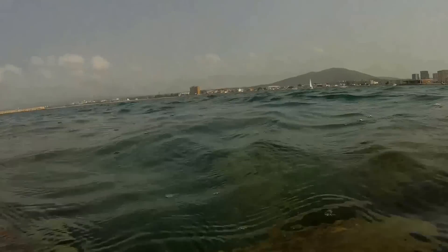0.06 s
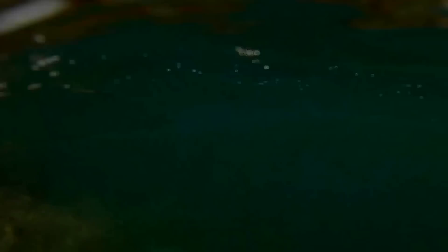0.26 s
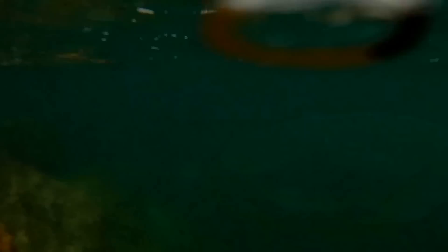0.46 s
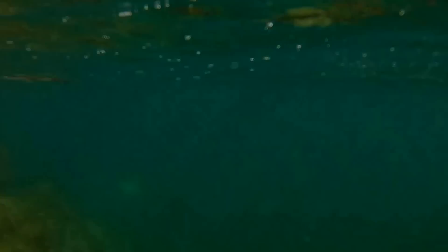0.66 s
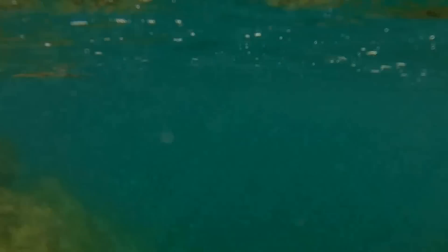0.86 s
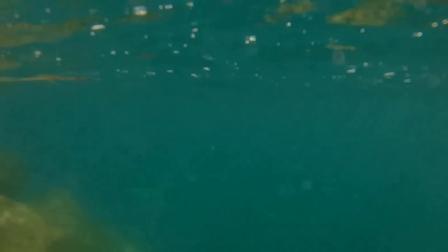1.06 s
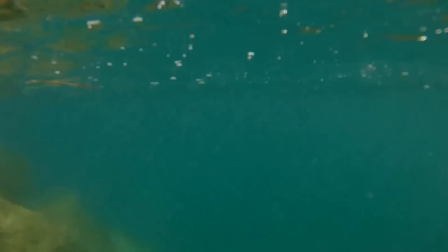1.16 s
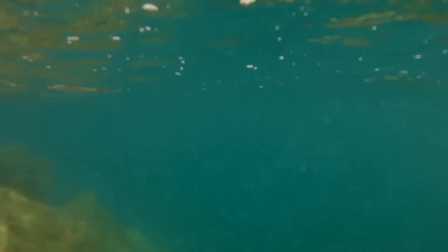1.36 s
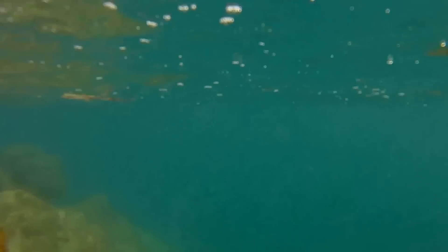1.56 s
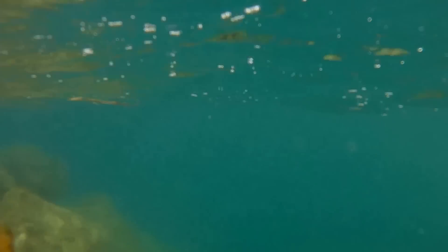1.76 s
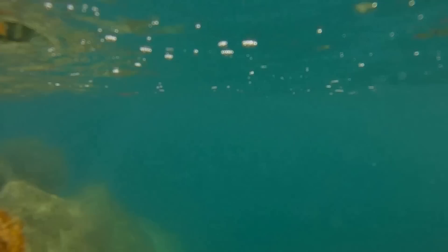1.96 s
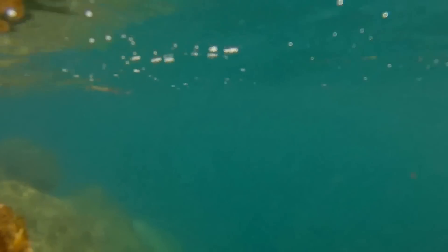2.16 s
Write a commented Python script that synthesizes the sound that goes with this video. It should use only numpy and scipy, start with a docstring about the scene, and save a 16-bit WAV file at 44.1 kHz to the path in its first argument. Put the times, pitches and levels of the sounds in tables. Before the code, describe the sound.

A wave slaps against a waterproof camera at the sea surface after a moment of faint lapping. Drops and bubbles crackle on the plastic housing as it sinks, leaving a quiet muffled wash and a few lone ticks.

```python
"""Faint lapping sea, then a wave slaps right against the microphone's sealed plastic camera housing.
As it dips under the surface, trapped air crackles off as drops and bubbles that tick on the shell;
under water a muffled wash and a few lone ticks remain. The one microphone inside the shell feeds
two inputs; each adds its own hiss, and the left one drifts with a deep rumble."""
import sys
import numpy as np
from scipy import signal
from scipy.fft import rfft, irfft
from scipy.io import wavfile
from scipy.ndimage import uniform_filter1d

SR = 44100
rng = np.random.default_rng(int(sys.argv[2]) if len(sys.argv) > 2 else 0)


def unload_audio(sound):
    """Save the sound as a 16-bit wav file, at the path given as the first command line argument."""
    columns = np.transpose(np.atleast_2d(sound))
    # keep every value between -1 and 1, then stretch to whole-number steps
    steps = np.round(np.clip(columns, -1, 1) * 32767)
    wavfile.write(sys.argv[1], SR, steps.astype(np.int16))


N = 97020
T = np.arange(N) / SR

# ringing modes of the plastic shell (pitch [Hz], relative level [dB], t60 [s])
SHELL_MODES = [(593, -9.5, 0.004), (1010, -4.5, 0.019), (1630, -1.5, 0.022), (2320.5, -4.5, 0.013),
               (3255, 2, 0.0082), (4010, -2.5, 0.0035), (4800, 2, 0.0075), (5620, -2.5, 0.0045),
               (7037, -2.5, 0.0074), (8194, -8, .005), (9650, -3.5, 0.0055), (10493, -5.5, .005),
               (12724, -12.5, 0.0046), (14744, -7, 0.0016)]


def undb(db):
    return 10 ** (np.asarray(db) / 20)


def unit_rms(x):
    return x / np.sqrt(np.mean(x ** 2))


def unit_peak(x):
    return x / np.abs(x).max()


def envelope(rows, fade_s=.012):
    """Gain from (time [s], level [dB]) rows, fading to silence outside them."""
    times, db = np.array(rows).T
    return undb(np.interp(T, np.r_[times[0] - fade_s, times, times[-1] + fade_s], np.r_[-120, db, -120]))


def coloured_noise(spectrum, lo_hz=0, hi_hz=SR):
    """Noise shaped by (frequency [Hz], level [dB]) rows, kept between two edges."""
    freqs = np.fft.rfftfreq(N, 1 / SR) + 1e-3
    hz, db = np.array(spectrum).T
    gain = undb(np.interp(np.log(freqs), np.log(hz), db, left=-90, right=-90))
    return irfft(rfft(rng.standard_normal(N)) * gain * (freqs >= lo_hz) * (freqs < hi_hz), N)


def wander(rate_hz):
    """Random values, each held for 1 / rate_hz seconds, smoothed twice."""
    hold = int(SR / rate_hz)
    steps = np.repeat(rng.standard_normal(N // hold + 1), hold)
    return 1.3 * uniform_filter1d(uniform_filter1d(steps, hold), hold)[:N]


def ring(x, hz, t60):
    """One decaying mode driven by x."""
    radius = np.exp(-np.log(1000) / (max(t60, 1e-3) * SR))
    angle = 2 * np.pi * hz / SR
    return signal.lfilter([0, np.sin(angle)], [1, -2 * radius * np.cos(angle), radius ** 2], x)


def add(out, start_s, x):
    start = int(start_s * SR)
    out[..., start:start + x.shape[-1]] += x[..., :N - start]


def lapping_sea():
    """The sea from just above the surface, heard only where the shell resonates; each band flickers."""
    # sea noise inside the housing (time [s], level [dB])
    levels = [(0.0, -64.5), (0.24, -70.5)]
    # resonances that let it through (centre [Hz], width [Hz], relative level [dB])
    resonances = [(1080, 220, -1.5), (1590, 250, -6.5), (2130, 330, -4), (2850, 200, -5), (3450, 470, 2),
                  (4696, 350, -1), (5400, 540, -10)]
    bands = [undb(db + 1.8 * wander(40)) * unit_rms(ring(rng.standard_normal(N), hz, t60=2.2 / width))
             for hz, width, db in resonances]
    return unit_rms(sum(bands)) * envelope(levels)


def water_taps():
    """Water hits right by the microphone: a ragged push rings the shell, with a crack and a bubble."""
    # taps on the shell (peak time [s], nominal rise [ms], nominal fall [ms], bubble pitch [Hz],
    # bubble level [dB], relative level of the low, low-middle, high-middle and high modes [dB])
    taps = [(0.07, 1.2, 0.8, 3780, -65, -77, -74, -50, -61),
            (0.2194, 4.6, 2.4, 4660, -60, -64, -73, -64, -75),
            (0.2469, 1.36, 3.74, 1686, -3, -42, 5.5, -7, -38),
            (0.2586, 1.5, 3.1, 1025, -14.5, -26, -28, -19.5, -38),
            (0.269, 1.7, 2.4, 1310, -33, -13.5, -36, -34, -32),
            (0.271, 4.3, 8.3, 4910, -25, -29, -39, -9.5, -24.5),
            (0.277, 1.27, 0.93, 1850, -4.5, -49, -22, -41, -14.5),
            (0.2825, 0.73, 1.1, 5450, -12.5, -28, -12, -9, -13.5),
            (0.2903, 0.7, 3.8, 4700, -34, -51, -33, -23, -34),
            (0.295, 4.6, 0.97, 12200, -31, -50, -45, -38, -34),
            (0.3005, 1.7, 0.3, 3460, -19, -60, -47, -42, -54),
            (0.303, 0.58, 0.32, 4580, -13, -48, -55, -30, -58),
            (0.3092, 2.2, 1.1, 4260, -35, -57, -40, -33, -57),
            (0.308, 2.9, 0.76, 4240, -16.5, -47, -49, -38, -38),
            (0.316, 2.9, 0.8, 3544, -39.5, -46.5, -43.5, -41, -58.5),
            (0.3214, 0.51, 1.2, 2397, -22, -46.5, -25, -28.5, -57),
            (0.3329, 1.6, 5.0, 1560, -29.5, -40.5, -25, -38, -67),
            (0.337, 0.69, 3.8, 620, -16, -25.5, -17, -29, -37),
            (0.3397, 2.2, 2.3, 1426, -17.5, -19.5, -8, -22.5, -23.5),
            (0.3426, 0.97, 1.4, 1190, -11.5, -13.5, -19.5, -19.5, -21.5),
            (0.3487, 5.9, 2.2, 922, -57, -45, -46, -25.5, -38),
            (0.3598, 2.8, 2.4, 2220, -30.5, -28, -48, -35, -31),
            (0.3648, 2.4, 3.68, 3120, -26.5, -21.5, -36.5, -51, -51),
            (0.3744, 1.1, 1.5, 4780, -43, -42, -46, -41, -32.5),
            (0.3804, 0.49, 2.6, 1060, -29, -32, -64, -53, -69),
            (0.3871, 2.2, 0.5, 9100, -32.5, -41, -59, -26, -31),
            (0.3926, 1.13, 0.95, 1970, -23.5, -32.5, -43, -27, -57),
            (0.405, 0.56, 0.65, 10500, -39.5, -64, -50, -47, -47),
            (0.4132, 1.4, 1.5, 1070, -35.5, -47, -35.5, -47, -74.5),
            (0.4169, 2.9, 1.6, 990, -43.5, -59, -59, -52, -53),
            (0.4325, 2.9, 7.2, 990, -62, -60, -62, -55, -56),
            (0.448, 0.68, 2.4, 4300, -41, -40.5, -45, -49, -40),
            (0.4513, 0.38, 0.79, 5200, -18.5, -50, -56, -28, -30),
            (0.4586, 0.38, 0.98, 4610, -26.5, -64, -42, -21, -29.5),
            (0.4735, 1.2, 0.86, 3490, -48, -54, -46, -45, -44),
            (0.4932, 1.8, 0.68, 1650, -36, -60, -43, -40, -52),
            (0.5085, 0.23, 1.04, 9300, -15.5, -62, -43.5, -19.5, -24),
            (0.519, 0.56, 0.45, 10190, -41, -64, -67, -71, -43),
            (0.553, 0.57, 1.6, 8540, -28, -27.5, -33, -38, -28),
            (0.559, 5.4, 1.9, 1020, -62, -54.5, -75, -55.5, -57),
            (0.573, 1.2, 4.6, 3500, -47, -50.5, -47, -50.5, -52),
            (0.5829, 0.92, 2.1, 3600, -38, -55.5, -32, -42, -31.5),
            (0.5976, 1.5, 0.58, 3500, -34, -68, -44, -36, -39),
            (0.6044, 1.2, 11, 1645, -52, -64, -55, -49, -43),
            (0.6078, 0.63, 0.61, 1640, -33, -51, -40.5, -54, -41),
            (0.611, 1.34, 0.5, 6830, -25, -69, -40.5, -35.5, -33),
            (0.643, 1.5, 4, 3230, -51, -74.5, -52.5, -53.5, -66),
            (0.6521, 0.44, 0.93, 12800, -38, -61.5, -49, -49, -42),
            (0.6948, 0.7, 2.6, 960, -48.5, -58, -66, -73, -77.5),
            (0.736, 6.3, 3.6, 3140, -63.5, -60.5, -65.5, -65, -74),
            (0.7652, 1.24, 1.4, 692, -39, -42, -60.5, -55, -71),
            (0.7952, 2.9, 3.5, 3150, -66.5, -59, -78, -63.5, -91),
            (0.8211, 0.82, 1.2, 3220, -51, -65, -56.5, -52, -47),
            (0.916, 0.89, 2.9, 3330, -55.5, -67.5, -56, -57, -67),
            (0.9663, 1.8, 2.8, 3260, -53, -67.5, -60.5, -45, -51.5),
            (0.9976, 0.57, 3.8, 3120, -58.5, -62, -55, -45, -51),
            (1.0093, 0.48, 0.7, 1540, -45.5, -51.5, -48, -53.5, -60.5),
            (1.275, 3, 2.3, 4660, -53.5, -67, -63, -46.5, -67),
            (1.8199, 0.52, 1.83, 3400, -28.5, -47, -30.5, -27.5, -23),
            (1.8778, 0.59, 1.7, 3320, -53.5, -73, -72, -52, -69),
            (1.8905, 1.1, 1.01, 11040, -51.5, -77, -78, -57, -49.5),
            (1.9419, 0.4, 1.9, 3220, -58, -64.5, -57, -55, -56.5),
            (1.9782, 1.14, 0.97, 10860, -53, -71.5, -60, -62, -50),
            (2.0976, 1.35, 5.0, 4580, -61, -67.5, -76, -57.5, -67),
            (2.194, 0.55, 2.5, 3470, -60.5, -67.5, -57, -58, -77)]
    # centres of those four groups of modes (frequency [Hz])
    group_hz = [1080, 2020, 3860, 7200]
    scatter_db, detune = 2.5, .04  # of each mode, from tap to tap
    wet_cycles, side_db = 45, -26  # longest t60 of the wet shell; left-right difference
    lead, length, modes = 256, 1536, len(SHELL_MODES)
    t = (np.arange(length) - lead) / SR

    def pulse(rise, fall):
        return np.where(t < 0, np.exp(-(t / rise) ** 2), np.exp(-np.abs(t) / fall))

    out = np.zeros((2, N))
    for peak_s, rise_ms, fall_ms, bubble_hz, bubble_db, *group_db in taps:
        rise, fall = .9 * rise_ms / 1000, fall_ms / 1000
        scatters, detunings = rng.standard_normal((2, modes))
        start_phase = 3 * rng.standard_normal()
        splash_noise, push_noise = rng.standard_normal((2, length))
        shell, side = np.zeros((2, length))
        for (hz, db, t60), scatter, detuning in zip(SHELL_MODES, scatters, detunings):
            push = pulse(rise, .8 * fall * (1500 / hz) ** .2) * push_noise  # dies sooner for high modes
            drive = ring(np.diff(push, prepend=0), hz, t60=5 / hz)  # the part near this mode's pitch
            mode = unit_peak(ring(drive, hz * (1 + detune * detuning), min(t60, wet_cycles / hz)))
            colour_db = np.interp(np.log(hz), np.log(group_hz), group_db)
            mode *= undb(db - 2 + colour_db + scatter_db * scatter)
            shell += mode
            side += undb(side_db) * np.sign(scatter) * mode
        wobble = .3 * unit_rms(uniform_filter1d(splash_noise, size=40))
        phase = 2 * np.pi * bubble_hz * t * (1 + .0066 * t / fall)  # the pitch glides up
        bubble = uniform_filter1d(pulse(rise, .99 * fall), size=15) * np.sin(phase + wobble + start_phase)
        burst = np.exp(-np.abs(t + rise / 2) / .0006) * splash_noise
        crack = unit_peak(np.diff(burst, n=2, prepend=[0, 0]))
        mid = shell + undb(bubble_db) * bubble + undb(group_db[-1] - 3) * crack
        add(out, peak_s - lead / SR, np.array([mid + side, mid - side]))
    # the stiff shell passes no bass from a tap
    return signal.sosfilt(signal.butter(4, 550, "high", fs=SR, output="sos"), out)


def thuds():
    """Soft low knocks of a cycle or two, stronger on the left."""
    # dull knocks (start [s], envelope peak before panning [dB], pitch [Hz])
    knocks = [(0.242, -68, 250), (0.27, -41.5, 125), (.336, -32, 310), (.341, -45.5, 150),
              (0.361, -40.5, 307), (0.386, -52, 181), (.415, -60, 129), (0.456, -53, 196),
              (0.552, -43.5, 270), (0.762, -52, 127), (1.01, -58.5, 200)]
    rise_cycles, pan_db = .3, 5
    t = np.arange(4096) / SR
    out = np.zeros(N)
    for start_s, db, hz in knocks:
        age = t * hz / rise_cycles
        swell = age * np.exp(1 - age)
        add(out, start_s, undb(db) * swell * np.sin(2 * np.pi * hz * t))
    return out * undb([[pan_db / 2], [-pan_db / 2]])


def spray_fizz():
    """Dense tiny drops of uneven size ring the shell in patches."""
    # spray between the taps (time [s], relative level [dB])
    levels = [(0.245, -68), (0.315, -64), (0.419, -60), (0.459, -52), (0.579, -66.5), (0.7, -68.5)]
    drops_per_s, size_spread_db, patchy_db = 2500, 1.5, 4
    hits = rng.random(N) < drops_per_s / SR
    drops = hits * undb(size_spread_db * rng.exponential(size=N)) * rng.standard_normal(N)
    ringing = unit_rms(sum(undb(db) * ring(drops, hz, t60) for hz, db, t60 in SHELL_MODES[1:]))
    return ringing * undb(patchy_db * wander(130) - 5.3) * envelope(levels, fade_s=.004)


def underwater_wash():
    """Muffled water around the sunken housing: half-octave bands swell together and flicker alone."""
    # the wash at the microphone (time [s], level [dB])
    levels = [(0.3, -75), (0.33, -49), (0.416, -62), (0.452, -78), (0.568, -64.5), (0.696, -65.5),
              (1.406, -67), (2.034, -71), (2.2, -70.5)]
    # its spectrum (frequency [Hz], relative density [dB])
    spectrum = [(71, -43.5), (120, -16), (245, -6), (281, -5), (940, 1), (2890, -7), (3370, -3.5),
                (3670, -9), (4650, -9.5), (7000, -25), (9100, -54), (15400, -120)]
    swell = undb(.7 * wander(2.2))
    edges_hz = 100 * 2 ** np.arange(0, 7, .5)
    bands = [coloured_noise(spectrum, lo, hi) * undb(1.24 * wander(9.4))
             for lo, hi in zip(edges_hz, edges_hz[1:])]
    return unit_rms(sum(bands) * swell) * envelope(levels)


def input_hiss():
    """Each of the two inputs adds its own steady hiss."""
    # spectrum of the hiss (frequency [Hz], relative density [dB])
    spectrum = [(59, -40), (100, -12.5), (464, -4.5), (1600, -11), (3100, -7.5), (12700, -2), (16400, -13)]
    return np.array([unit_rms(coloured_noise(spectrum)) for _ in range(2)]) * undb(-71.5)


def input_rumble():
    """The left input drifts with a deep rumble around a steady offset; the right follows faintly."""
    # spectrum of the rumble (frequency [Hz], relative density [dB])
    spectrum = [(5, -11), (9, 0.5), (18, -5.5), (30, -11), (50, -20), (80, -27.5), (120, -36.5), (200, -46),
                (330, -62)]
    # its rise and fall (time [s], relative level [dB])
    levels = [(0.0, -62), (0.14, -59), (0.18, -75), (0.33, -63), (0.39, -69), (1.46, -74), (2.15, -69.5),
              (2.2, -66)]
    left_db, right_db, left_offset = 13, -5.5, -.0016
    shared, right_only = (unit_rms(coloured_noise(spectrum)) for _ in range(2))
    rumble = np.array([undb(left_db) * shared, undb(right_db) * (shared + .27 * right_only)])
    return rumble * envelope(levels) + [[left_offset], [0]]


def scene():
    """All that reaches the microphone through the shell."""
    return water_taps() + thuds() + spray_fizz() + lapping_sea() + underwater_wash()


def record(dry):
    """The inputs add hiss and rumble, clip at full scale and cut the top treble steeply."""
    inputs = np.clip(dry + input_hiss() + input_rumble(), -1, 1)
    return signal.sosfilt(signal.ellip(10, .2, 90, 16300, fs=SR, output="sos"), inputs)


dry = scene()
out = record(dry)
unload_audio(out)
```